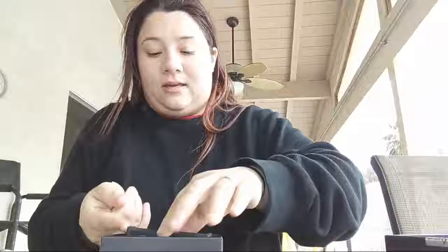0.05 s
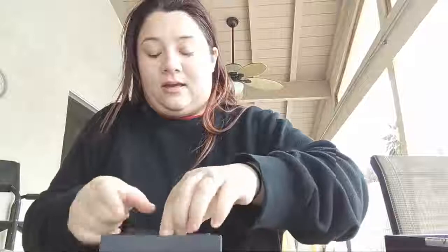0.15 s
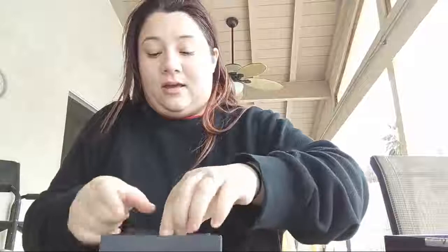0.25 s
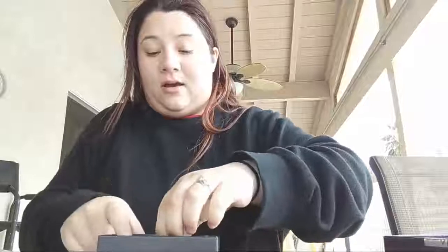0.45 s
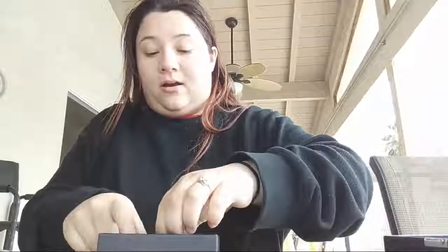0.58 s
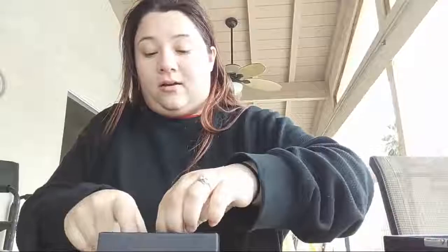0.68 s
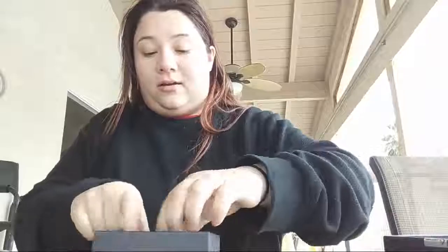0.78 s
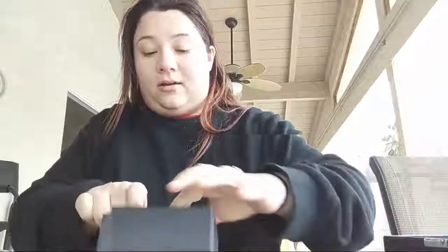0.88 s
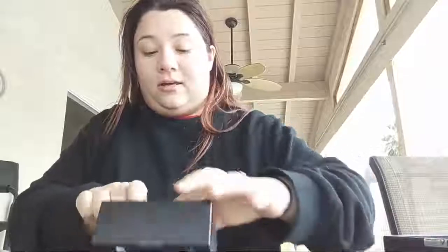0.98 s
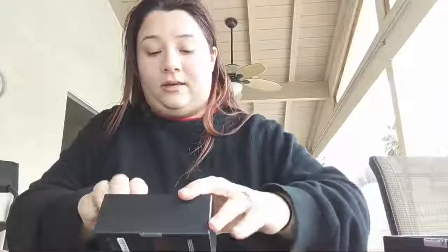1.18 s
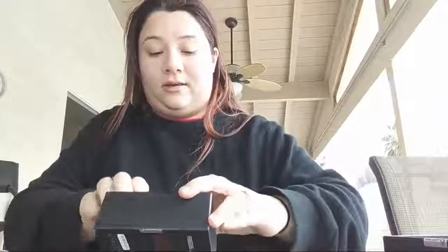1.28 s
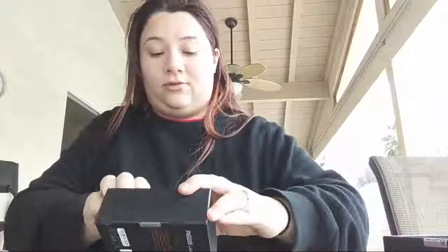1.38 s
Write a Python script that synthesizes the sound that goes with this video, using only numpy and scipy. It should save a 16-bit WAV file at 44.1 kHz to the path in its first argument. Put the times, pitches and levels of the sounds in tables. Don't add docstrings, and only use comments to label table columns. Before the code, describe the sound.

Fingernails pick faintly at a small stiff cardboard box, then one snaps off the edge with a sharp hollow pop and a clatter of small clicks; later a softer knock and sliding rubs, close, on a covered patio.

```python
import sys
import numpy as np
from scipy import signal
from scipy.io import wavfile

SR = 44100
rng = np.random.default_rng(int(sys.argv[2]) if len(sys.argv) > 2 else 0)


def level_to_linear(level):
    exponent = np.asarray(level, float) / 20
    return 10 ** exponent


def digitize_waveform(pressure):
    field = np.atleast_2d(pressure).T
    bounded = np.clip(field, -1, 1)
    quanta = np.round(bounded * 32767).astype(np.int16)
    wavfile.write(sys.argv[1], SR, quanta)


N = 63945

# (frequency [Hz], level [dB], t60 [s])
BOX_MODES = [(259.4, -43, 0.13), (390, -27.5, 0.038), (533, -9, 0.015), (702, 0.3, 0.0093),
             (1176, 1.5, 0.0098), (1291, -4, .022), (1740, -11.5, 0.0048), (1960, -19.5, 0.005),
             (3000, -19.5, 0.0041), (3078, -17.5, 0.0086), (3865, -24, 0.011), (5260, -31.5, 0.011),
             (6830, -27, 0.011), (7600, -38, 0.0041)]
# (time [s], strength [dB], hardness cut-off [Hz], tilt [dB/octave])
NAIL_TAPS = [(.1665, -55, 1500, 10), (.1836, -47.5, 3000, 9), (.2450, -43, 3000, 8), (.2475, -68, 7000, -8),
             (.2488, -9, 9000, 0.6), (.2550, -30, 2000, 8), (.2620, -29, 3000, 2), (.2702, -48, 1600, 15.5),
             (.2841, -32, 4000, -6), (.2884, -30, 4000, 0.3), (.3170, -42, 800, -10), (.3230, -37, 795, 6),
             (.3300, -47.5, 806, -21), (0.355, -59, 4000, 14), (.3915, -53, 2000, -5),
             (.5355, -52, 3000, 6.5), (.7835, -54, 1500, -16.5), (.8135, -51, 3000, 4),
             (.9130, -40, 4000, 4.5), (.9155, -38.5, 5900, 4), (.9172, -32.5, 900, -10),
             (.9430, -54, 1500, -18), (.9705, -43, 2580, 9), (1.1821, -42.5, 3000, 0.5),
             (1.4240, -48.5, 2500, -1.5)]
TAP_SPREAD_DB = 2.5
CONTACT_S, RELEASE_GAIN = 0.00075, 0.7

# (time [s], level [dB])
RATTLE_LEVEL = [(0, -78.5), (.24, -60.5), (.256, -44), (.295, -44.5), (.335, -61), (.38, -65), (.6, -83),
                (.76, -74), (.9, -57), (.925, -52), (.95, -62.5), (.975, -51), (.995, -65.5), (1.05, -57.5),
                (1.15, -64.5), (1.3, -66), (1.41, -100), (1.45, -50)]
RATTLE_PER_S, RATTLE_CUT_HZ, TABLE_BOOST_DB = 600, 1500, 8
# (frequency [Hz], level [dB], t60 [s])
PANEL_MODES = [(660, -3, .03), (900, -4, .025), (1050, -6, .02)]

# (time [s], level [dB])
NAIL_CRACKS = [(.1635, -50), (.1834, -49), (.2628, -44), (.2841, -31.5), (.2890, -38), (.2925, -27),
               (.3200, -35), (.3560, -56), (.9160, -37), (.9400, -48), (1.0305, -49)]
CRACK_LOW_HZ, CRACK_HIGH_HZ = 1400, 4400
# (time [s], level [dB])
FIBRE_TICKS = [
    (.1832, -50),
    (0.2474, -53),
    (.2700, -46),
    (.2842, -65),
    (0.2973, -59),
    (0.2994, -44),
    (0.914, -55),
    (.9300, -52),
    (1.418, -68),
]
TICK_LOW_HZ, TICK_HIGH_HZ = 8000, 13500

# (time [s], level [dB])
RUB_LEVEL = [(0, -73.5), (.2, -67.5), (.245, -62.5), (.256, -63), (.3, -54.5), (.34, -67.5), (.4, -78),
             (.7, -84), (.82, -69.5), (.87, -70.5), (.912, -56), (.935, -65.5), (1.03, -57), (1.1, -61.5),
             (1.25, -67), (1.36, -82), (1.43, -72), (1.45, -57.5)]
# (frequency [Hz], width [Hz], level [dB])
PAPER_PEAKS = [(1420, 410, 2.5), (2120, 540, 4.4), (2777, 190, 0.5), (3565, 1220, 2.5), (4470, 290, -14)]
RUB_PER_S = 4000
# (time [s], level [dB])
EDGE_LEVEL = [(0, -84.5), (.245, -82.5), (.252, -62), (.298, -65.5), (.34, -92), (.87, -87), (.914, -64),
              (.94, -78), (1.05, -77), (1.15, -95), (1.43, -101), (1.44, -62), (1.45, -70)]
# (frequency [Hz], width [Hz], level [dB])
EDGE_PEAKS = [(6580, 830, 4), (8570, 2100, -0.5), (9900, 1700, -13), (13300, 2800, -17)]
LID_S, LID_RISE_S, LID_HZ, LID_WIDTH_HZ, LID_DB = 1.42, 0.03, 2430, 550, -54

# (time [s], level [dB])
TABLE_BUMPS = [
    (0.2494, -44.5),
    (.322, -48),
    (.372, -54.5),
    (0.913, -50),
    (0.956, -54.5),
    (1.033, -58.5),
]
BUMP_CUT_HZ = 400
TABLE_HZ, TABLE_T60_S = 252, 0.14
LEG_HZ, LEG_T60_S, LEG_DB = 114, 0.17, -11
NUDGE_S, NUDGE_RISE_S, NUDGE_HZ, NUDGE_T60_S, NUDGE_DB = 0.313, 0.013, 662, 0.07, -43

# (delay [s], level [dB])
PATIO_ECHOES = [(.009, -35), (.017, -20.5), (.024, -29), (.041, -34), (.058, -32), (.077, -24)]
ECHO_CUT_HZ = 5200
CHIRP_S, CHIRP_LEN_S, CHIRP_FROM_HZ, CHIRP_TO_HZ, CHIRP_DB = 0.538, 0.05, 3230, 3950, -73
# (frequency [Hz], density [dB/Hz])
HUM_SPECTRUM = [(30, -17.5), (110, -18.5), (245, -2), (320, -4), (750, 0.6), (1150, -3), (1450, -12),
                (4200, -20.5)]
HUM_DB, HUM_PATCH_DB = -60.5, 2
# (frequency [Hz], density [dB/Hz])
HISS_SPECTRUM = [(3000, 3), (4500, 0), (6500, -13), (7700, -21), (9500, 10.3), (11200, 2), (13000, 8.5),
                 (17000, -1.5)]
HISS_DB, HISS_PATCH_DB = -78.5, 1.3
MIC_LOW_HZ, MIC_TOP_HZ = 150, 16200


def in_time(rows):
    s, db = np.transpose(rows)
    return level_to_linear(np.interp(np.arange(N) / SR, s, db))


def rms_one(x):
    return x / np.sqrt(np.mean(x ** 2) + 1e-20)


def butter(x, order, hz, kind="low"):
    return signal.sosfilt(signal.butter(order, hz, kind, fs=SR, output="sos"), x)


def drift(rate_hz):
    r = np.exp(-80 * np.pi * rate_hz / SR)
    noise = rng.standard_normal(N // 40 + 2002)
    slow = rms_one(signal.lfilter([1], [1, -2 * r, r * r], noise)[2000:])
    return np.interp(np.arange(N) / 40, np.arange(len(slow)), slow)


def ring(x, hz, t60_s):
    r = level_to_linear(-60 / (t60_s * SR))
    w = 2 * np.pi * hz / SR
    return signal.lfilter([0, np.sin(w)], [1, -2 * r * np.cos(w), r * r], x + 1e-18)


def resonate(x, peaks):
    out = 0
    for hz, width_hz, db in peaks:
        r = np.exp(-np.pi * width_hz / SR)
        zeros = [(1 - r * r) / 2, 0, (r * r - 1) / 2]
        poles = [1, -2 * r * np.cos(2 * np.pi * hz / SR), r * r]
        out = out + level_to_linear(db) * signal.lfilter(zeros, poles, x)
    return rms_one(out)


def resonate_twice(x, hz, width_hz):
    peak = [(hz, width_hz, 0)]
    return resonate(resonate(x, peak), peak)


def grains(rate_per_s, spread_db):
    sizes = level_to_linear(spread_db * np.minimum(rng.exponential(1, N), 4))
    signs = rng.choice([-1, 1], N)
    dice = rng.random(N)
    chance = rate_per_s * level_to_linear(3.0 * drift(40)) / SR
    return sizes * signs * (dice < chance)


def snaps(events, low_hz, high_hz):
    out = np.zeros(N)
    bursts = rng.standard_normal((len(events), 100)) * np.exp(-np.arange(100) / 25)
    for (s, db), burst in zip(events, bursts):
        i = int(s * SR)
        out[i:i + 100] += level_to_linear(db) * burst
    return butter(out, 3, [low_hz, high_hz], "band")


def taps():
    out = np.zeros(N)
    luck = rng.standard_normal((len(NAIL_TAPS), len(BOX_MODES)))
    t = np.arange(8820) / SR
    lag = int(CONTACT_S * SR)
    for (s, db, cut_hz, tilt_db), tap_luck in zip(NAIL_TAPS, luck):
        press = np.zeros(len(t))
        for k, (hz, mode_db, t60_s) in enumerate(BOX_MODES):
            level_db = mode_db + tilt_db * np.log2(hz / 800) + TAP_SPREAD_DB * tap_luck[k]
            press += (-1) ** (k + 1) * level_to_linear(level_db - 60 * t / t60_s) * np.sin(2 * np.pi * hz * t)
        release = np.concatenate([np.zeros(lag), press[:-lag]])
        hit = butter(press - RELEASE_GAIN * release, 3, min(cut_hz, 18000))
        i = int(s * SR)
        out[i:i + len(t)] += level_to_linear(db) * hit[:N - i]
    return out


def rattle():
    push = butter(grains(RATTLE_PER_S, spread_db=4.5), 2, RATTLE_CUT_HZ)
    out = np.zeros(N)
    for k, (hz, db, t60_s) in enumerate(sorted(BOX_MODES + PANEL_MODES)):
        boost_db = TABLE_BOOST_DB * (hz < 450)
        out += (-1) ** k * level_to_linear(db + boost_db) * ring(push, hz, 1.12 * t60_s)
    return in_time(RATTLE_LEVEL) * rms_one(out)


def cracks():
    return snaps(NAIL_CRACKS, CRACK_LOW_HZ, CRACK_HIGH_HZ)


def ticks():
    return snaps(FIBRE_TICKS, TICK_LOW_HZ, TICK_HIGH_HZ)


def rub():
    fibres = grains(RUB_PER_S, spread_db=2.0)
    paper = sum(level_to_linear(db) * resonate_twice(fibres, hz, width_hz) for hz, width_hz, db in PAPER_PEAKS)
    return in_time(RUB_LEVEL) * rms_one(paper)


def edge():
    friction = rng.standard_normal(N) * level_to_linear(1.5 * drift(68))
    return in_time(EDGE_LEVEL) * resonate(friction, EDGE_PEAKS)


def lid():
    swell = np.clip((np.arange(N) / SR - LID_S) / LID_RISE_S, 0, 1)
    return level_to_linear(LID_DB) * swell * resonate_twice(grains(5000, spread_db=2.0), LID_HZ, LID_WIDTH_HZ)


def bumps():
    s, db = np.transpose(TABLE_BUMPS)
    push = np.zeros(N)
    push[(s * SR).astype(int)] = level_to_linear(db)
    push = butter(push, 2, BUMP_CUT_HZ)
    return ring(push, TABLE_HZ, TABLE_T60_S) - level_to_linear(LEG_DB) * ring(push, LEG_HZ, LEG_T60_S)


def nudge():
    t = np.maximum(np.arange(N) / SR - NUDGE_S, 0)
    envelope = level_to_linear(NUDGE_DB - 60 * t / NUDGE_T60_S) * (t / NUDGE_RISE_S) ** 2
    return envelope * np.sin(2 * np.pi * NUDGE_HZ * t)


def patio(x):
    response = np.zeros(SR // 8)
    smears = rng.standard_normal((len(PATIO_ECHOES), 200)) * np.hanning(200) / 9
    for (s, db), smear in zip(PATIO_ECHOES, smears):
        i = int(s * SR)
        response[i:i + 200] += level_to_linear(db) * smear
    return butter(signal.fftconvolve(x, response)[:N], 1, ECHO_CUT_HZ)


def bird():
    u = np.clip((np.arange(N) / SR - CHIRP_S) / CHIRP_LEN_S, 0, 1)
    hz = CHIRP_FROM_HZ + (CHIRP_TO_HZ - CHIRP_FROM_HZ) * u ** 1.32
    phase = 2 * np.pi * np.cumsum(hz) / SR
    return level_to_linear(CHIRP_DB) * np.sin(np.pi * u) * np.sqrt(2) * np.sin(phase)


def banded_noise(spectrum, patchy_db):
    out, together = 0, drift(3.0)
    edges_hz = 25 * 2 ** (np.arange(29) / 3)
    white = rng.standard_normal((2, N + 8000))
    at_hz, db = np.transpose(spectrum)
    for k, (low_hz, high_hz) in enumerate(zip(edges_hz, edges_hz[1:])):
        hz = np.sqrt(low_hz * high_hz)
        octaves_outside = max(0, np.log2(hz / at_hz[-1])) + max(0, np.log2(at_hz[0] / hz))
        level_db = np.interp(np.log(hz), np.log(at_hz), db) - 14 * octaves_outside
        band = butter(white[k % 2], 2, [low_hz, high_hz], "band")[8000:]
        flicker_db = patchy_db * (0.52 * together + drift(13.8))
        out = out + level_to_linear(level_db + flicker_db) * band
    return rms_one(out)


def background():
    hum = level_to_linear(HUM_DB) * banded_noise(HUM_SPECTRUM, HUM_PATCH_DB)
    hiss = level_to_linear(HISS_DB) * banded_noise(HISS_SPECTRUM, HISS_PATCH_DB)
    return hum + hiss


def scene():
    floor = background()
    hands = rattle() + rub() + edge() + lid() + ticks() + cracks() + taps() + bumps() + nudge()
    hands = butter(hands, 3, MIC_LOW_HZ, "high")
    return (hands + patio(hands) + bird() + floor)[None]


def band_limit(x):
    return signal.sosfilt(signal.butter(12, 16430, fs=SR, output="sos"), x)


def record(dry):
    top_cut = signal.cheby2(12, 50, MIC_TOP_HZ, fs=SR, output="sos")
    return band_limit(signal.sosfilt(top_cut, dry))


dry = scene()
out = record(dry)
digitize_waveform(out)
```